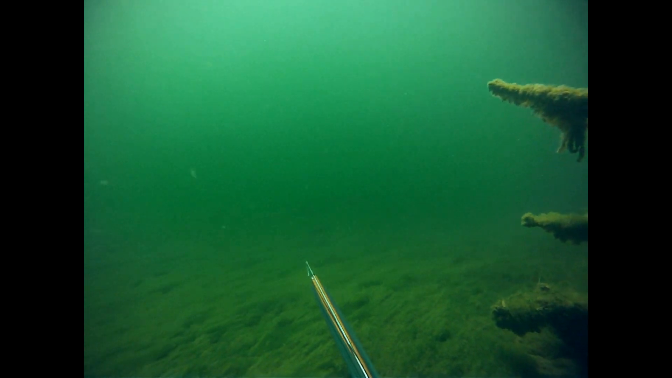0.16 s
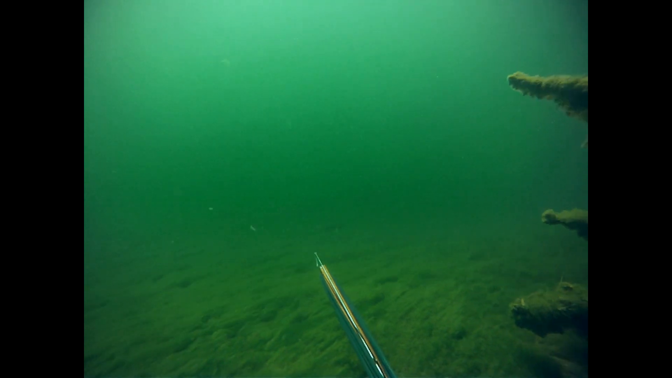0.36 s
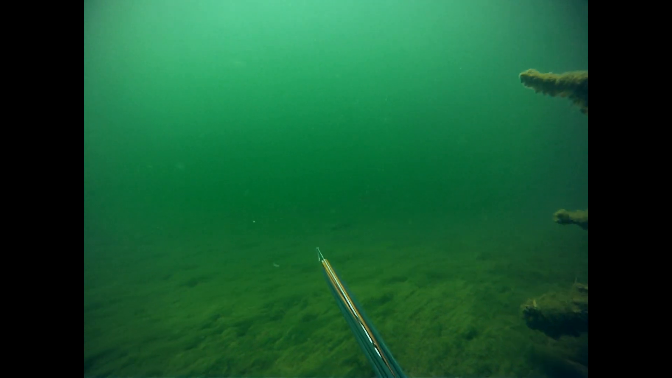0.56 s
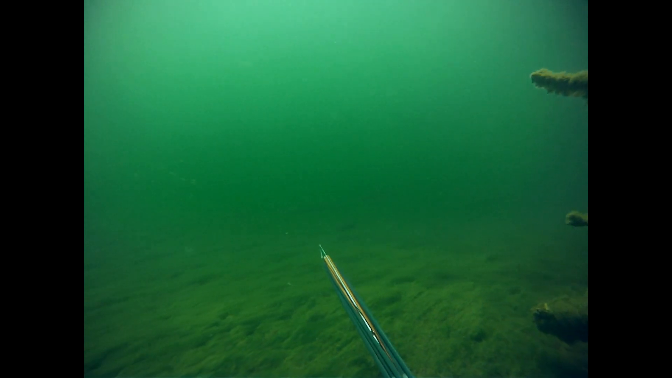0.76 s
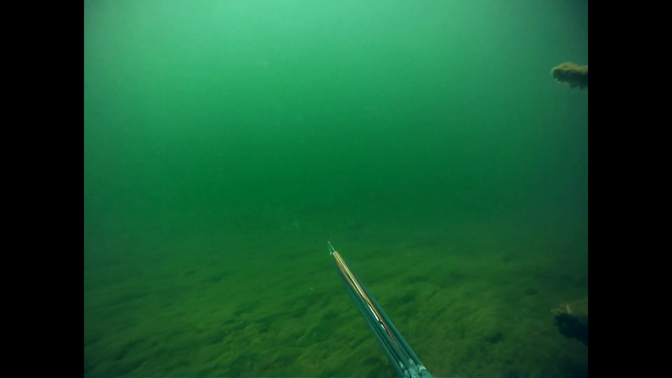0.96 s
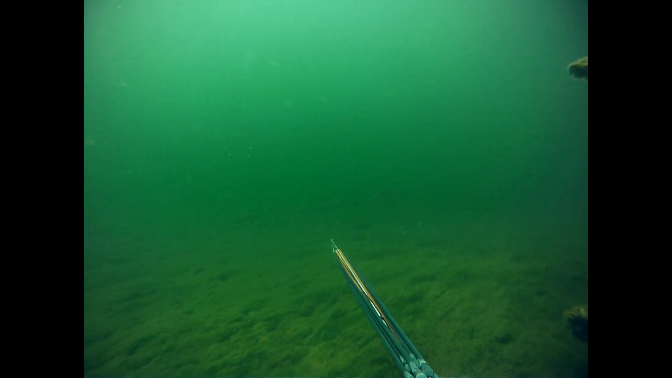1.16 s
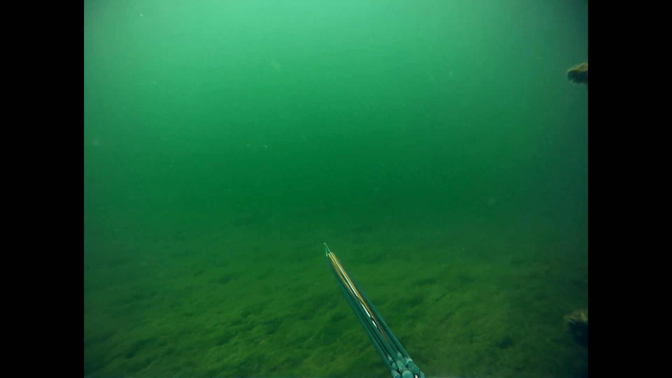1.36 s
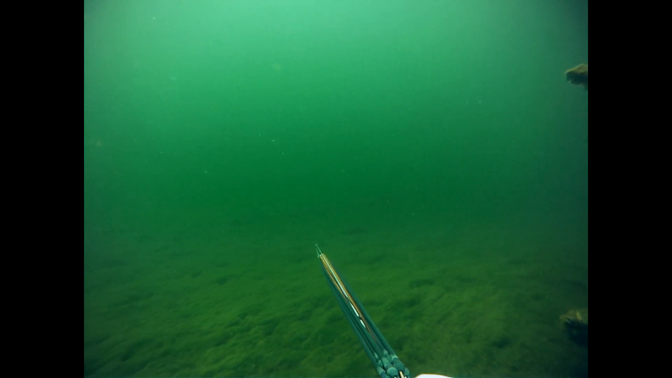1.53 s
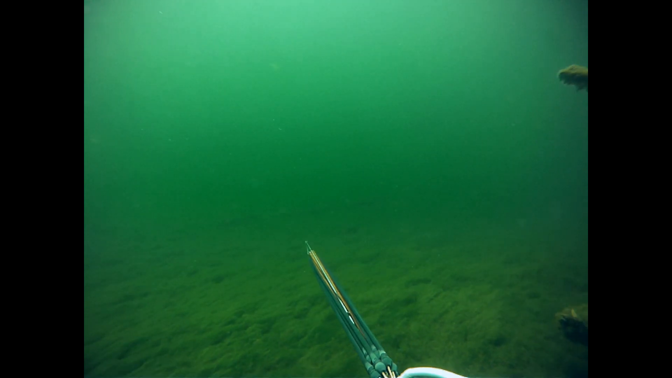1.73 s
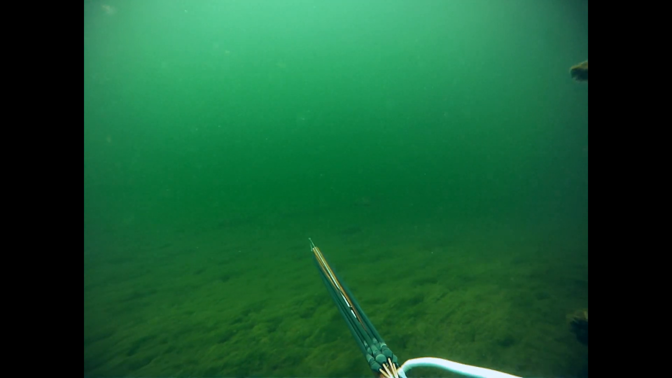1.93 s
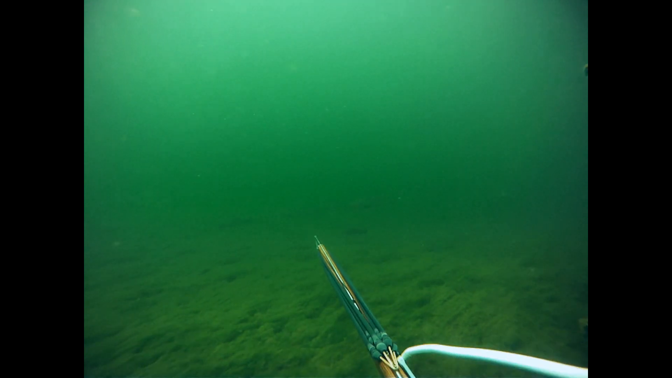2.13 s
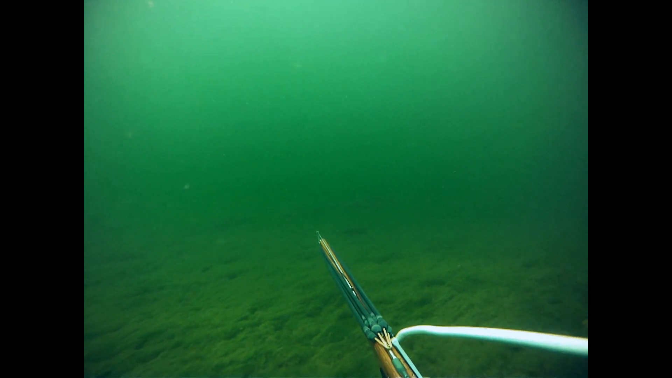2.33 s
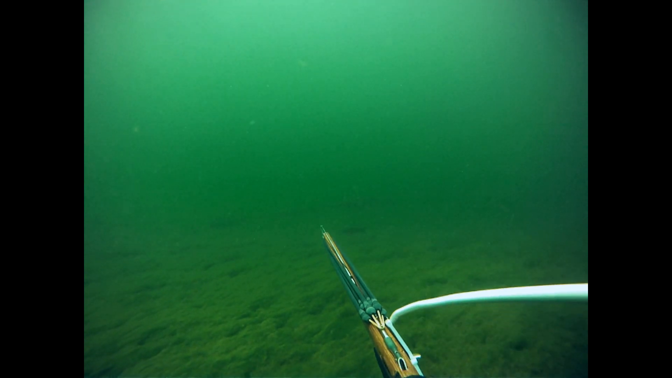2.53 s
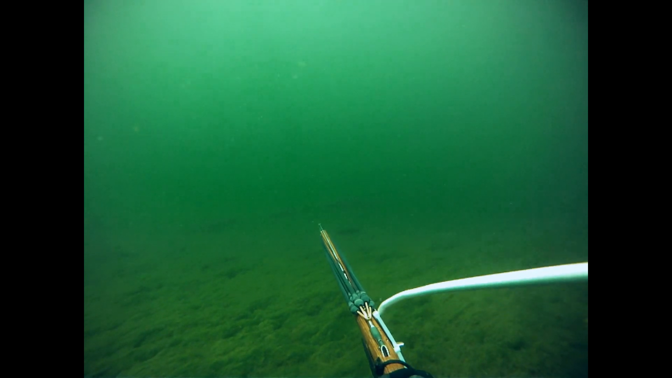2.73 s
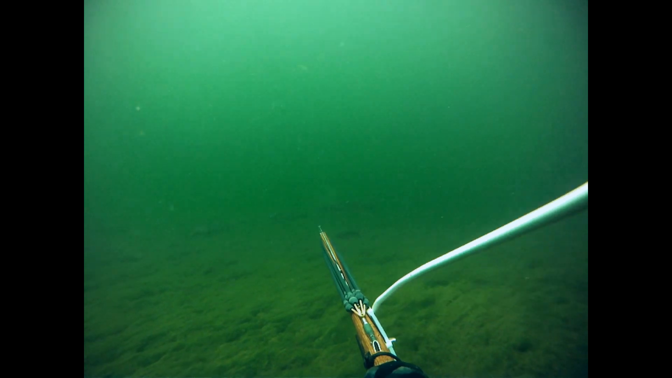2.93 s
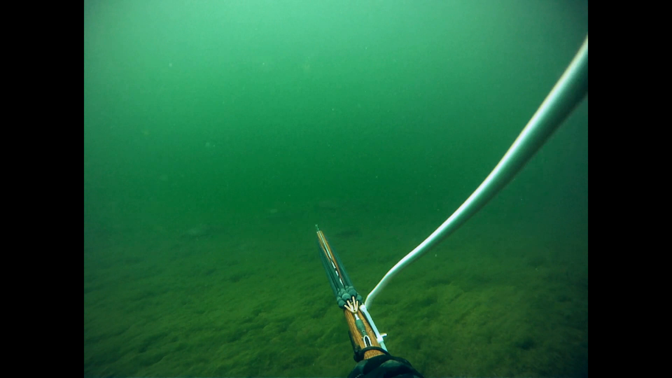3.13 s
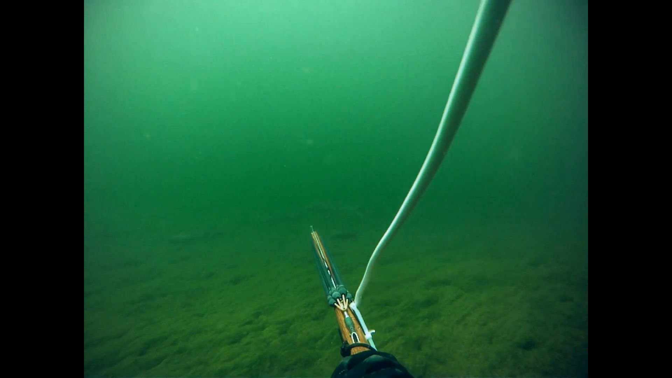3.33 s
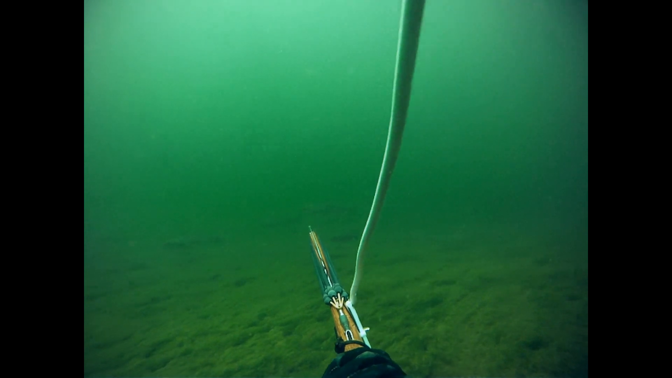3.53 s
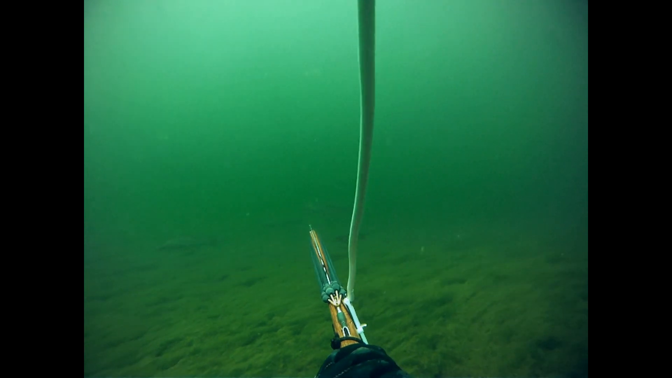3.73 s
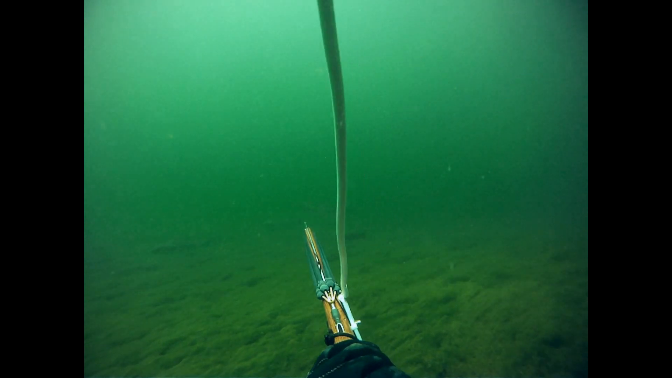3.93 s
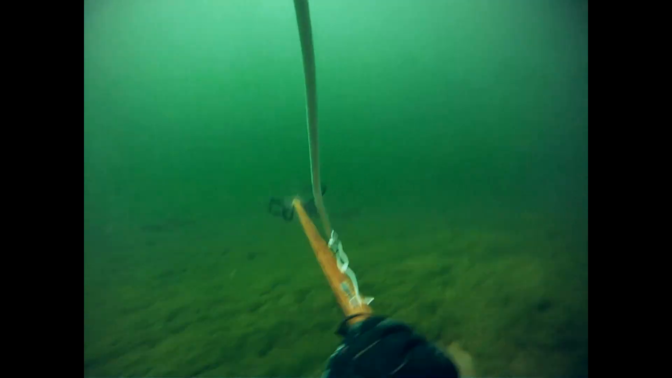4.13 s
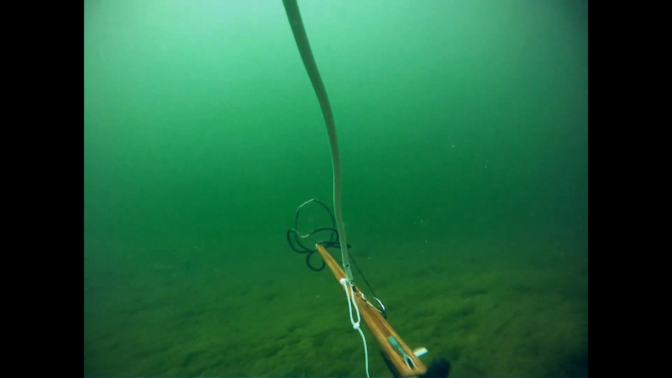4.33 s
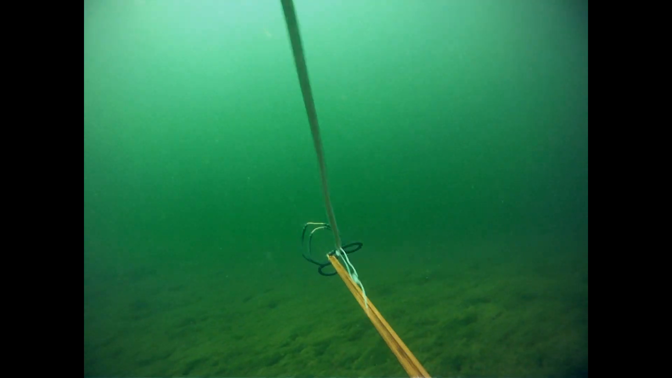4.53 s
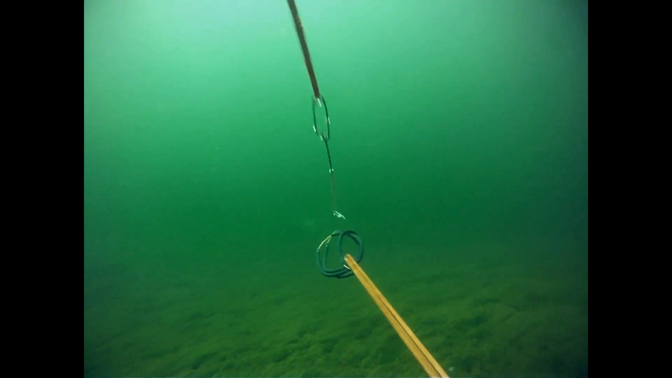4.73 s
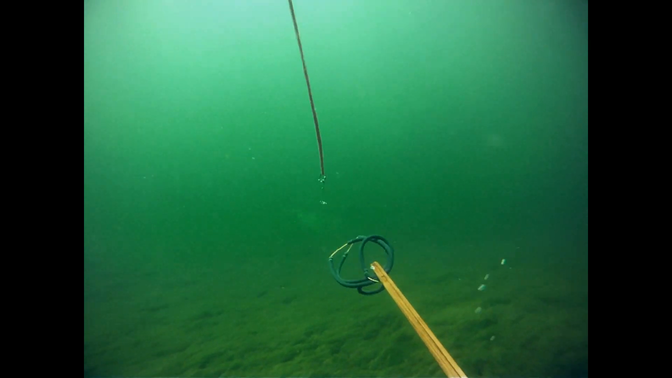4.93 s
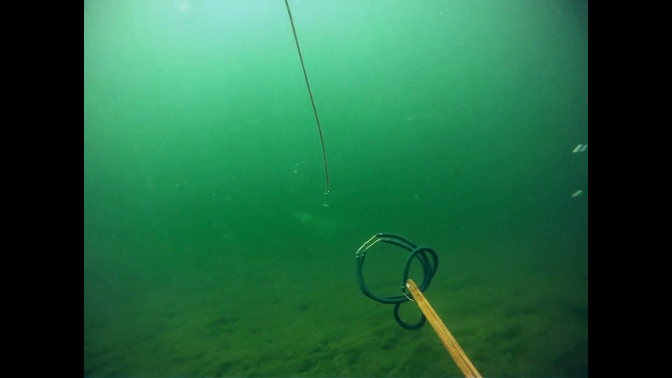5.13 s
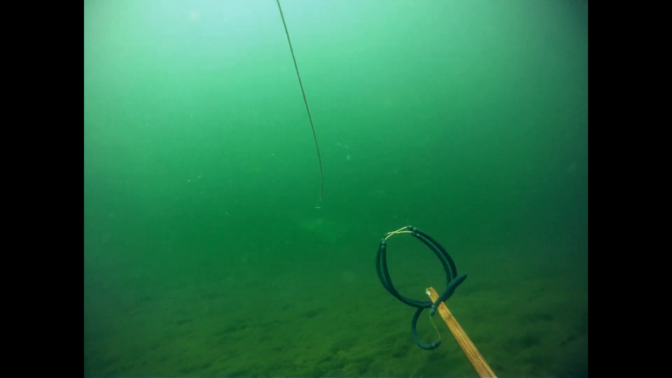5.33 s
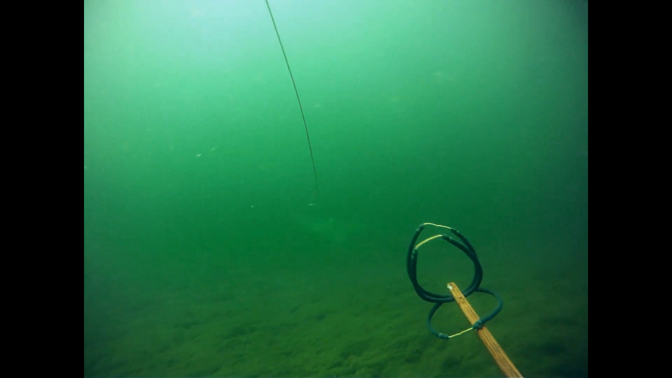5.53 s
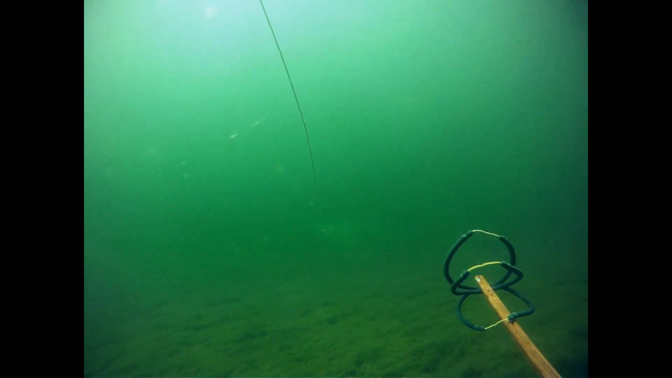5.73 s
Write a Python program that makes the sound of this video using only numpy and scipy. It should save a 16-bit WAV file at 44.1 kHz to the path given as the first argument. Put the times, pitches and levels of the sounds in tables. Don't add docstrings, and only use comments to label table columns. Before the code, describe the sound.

A camera underwater picks up small handling clicks, a violent speargun snap at four seconds, rattling slaps, then a fading low strum and flicks.

```python
import sys
import numpy as np
from scipy import signal
from scipy.fft import rfft, irfft, next_fast_len
from scipy.io import wavfile
from scipy.ndimage import uniform_filter1d, map_coordinates

SR = 44100
rng = np.random.default_rng(int(sys.argv[2]) if len(sys.argv) > 2 else 0)


def natural_amplitude(level_db):
    exponent = np.asarray(level_db, float) / 20
    return 10 ** exponent


def wrap_up_sound(samples):
    columns = np.atleast_2d(samples).T
    tamed = np.clip(columns, -1, 1)
    steps = np.round(tamed * 32767).astype(np.int16)
    wavfile.write(sys.argv[1], SR, steps)


N = 254898


def unit(x):
    return x / np.sqrt(np.mean(x ** 2) + 1e-20)


def curves(rows):
    s, *columns = np.transpose(rows)
    return [np.interp(np.arange(N) / SR, s, column) for column in columns]


def filtered(x, response):
    size = next_fast_len(N + SR // 2)
    return irfft(rfft(x, size) * response(np.fft.rfftfreq(size, 1 / SR)), size)[:N]


def resonant(x, modes):
    def response(f):
        total = 0
        for k, (centre, width, db) in enumerate(modes):
            damping = 1j * f * width
            total = total + (-1) ** k * natural_amplitude(db) * damping / (centre * centre - f * f + damping)
        return total
    return filtered(x, response)


def band(lo_hz, hi_hz):
    def response(f):
        low_cut = (f / lo_hz) ** 2 / (1 + (f / lo_hz) ** 2)
        return low_cut / (1 + (f / hi_hz) ** 2)
    return unit(filtered(rng.standard_normal(N), response))


def coloured(spectrum):
    f, db = np.transpose(spectrum)
    return unit(filtered(rng.standard_normal(N), lambda hz: natural_amplitude(np.interp(np.log(hz + 1), np.log(f + 1), db))))


def grit(rate, spread_db):
    knots = rng.standard_normal(int(N * rate / SR) + 4)
    loudness_db = spread_db * map_coordinates(knots, [np.arange(N) * rate / SR])
    return natural_amplitude(loudness_db) * rng.standard_normal(N)


def add(track, s, piece):
    part = track[round(s * SR):][:len(piece)]
    part += piece[:len(part)]


def swell(t, rise, length):
    shape = (1 - np.exp(-(t / rise) ** 2)) * np.exp(-(t / length) ** 2)
    return shape / shape.max()


# (frequency [Hz], width [Hz], level [dB])
WINDOW = [(2840, 150, -7), (3950, 260, 0), (5250, 130, -23.5)]
# (frequency [Hz], width [Hz], level [dB])
SEAL = [(4600, 4800, -7)]


def strike(contacts, length_ms, body_db):
    ring, snap, thud = np.zeros(N), np.zeros(N), np.zeros(N)
    t = np.arange(SR // 8) / SR
    length = length_ms / 1000
    for s, db, hz, bright_db in contacts:
        second = np.sin(2 * np.pi * 1.149 * hz * t + 2 * np.pi * rng.random())
        beat = 0.98 * np.sin(2 * np.pi * hz * t) + 0.42 * second
        burst = swell(t, 0.0005, 0.64 * length) * rng.standard_normal(len(t))
        add(ring, s - 0.0003, natural_amplitude(db) * swell(t, 0.0011, length) * beat)
        add(snap, s - 0.0003, natural_amplitude(db + bright_db + 15.5) * burst)
        add(thud, s, natural_amplitude(db + body_db + 13.5) * swell(t, 0.00016, 0.00026))
    tail = resonant(ring, [(1720, 160, -24), (2170, 150, -24)])
    return ring + tail + resonant(snap, WINDOW + SEAL) + resonant(thud, [(900, 1300, 0.00077)])


def padded_blows(blows):
    out, t = np.zeros(N), np.arange(SR // 4) / SR
    for s, db, hz, length in blows:
        overtone = 0.18 * np.sin(2 * np.pi * 1.366 * hz * t + 2 * np.pi * rng.random())
        cycles = np.sin(2 * np.pi * hz * t) + overtone
        add(out, s - 0.0015, natural_amplitude(db) * swell(t, 0.2 * length, length) * cycles)
    return out


# (frequency [Hz], level per Hz [dB])
AMPLIFIER_HISS = [(12, -45), (20, 1), (85, -3), (137, -4), (301, -13.5), (324, -13), (421, -14), (463, -15),
                  (630, -17.5), (2220, -22), (5900, -28.5), (7670, -55), (13000, -120)]
# (time [s], level [dB])
MOTION = [(0, -62.5), (1.2, -67.5), (1.8, -63), (2, -64), (2.4, -61), (2.8, -73), (3.1, -65), (3.46, -67),
          (3.86, -55), (3.99, -55.5), (4.14, -25), (4.18, -29), (4.36, -45), (4.85, -46), (5.09, -52),
          (5.78, -58)]


def water():
    motion_db, = curves(MOTION)
    hiss = natural_amplitude(-60) * coloured(AMPLIFIER_HISS)
    slosh = natural_amplitude(motion_db - 3.5) * band(11, 55)
    gurgle_level = natural_amplitude(-68.5) + natural_amplitude(motion_db - 16)
    return hiss + slosh + gurgle_level * natural_amplitude(-5.5) * band(130, 330)


def creak():
    t = np.arange(N) / SR
    stroke = np.clip((t - 0.37) / 0.057, 0, 1) * (t < 0.505)
    squeak = resonant(grit(rate=140, spread_db=5.5), [(3900, 900, 4), (4640, 550, -7)])
    return natural_amplitude(-66.5) * stroke * unit(squeak)


# (time [s], peak level [dB], ring [Hz], brightness [dB])
HANDLING = [(.5072, -45.5, 1740, -12), (.5397, -47, 2000, -18), (1.7613, -37, 1540, -20),
            (1.7617, -38.5, 2150, -25), (1.7757, -48, 1640, -27), (2.2218, -53, 1590, -11),
            (2.2717, -51, 1580, -20), (2.2974, -56, 1980, -20), (2.4269, -49, 1570, -19),
            (2.6137, -45, 1390, -31), (2.624, -26.5, 1890, -28), (2.628, -30.5, 1950, -36),
            (2.6953, -42.5, 1950, -20), (2.71, -49, 1680, -19), (2.7219, -23.5, 2030, -15)]


def handling():
    return strike(HANDLING, length_ms=2.67, body_db=-17)


# (time [s], peak level [dB], ring [Hz], length [s])
KNOCKS = [(.511, -40, 374, 0.0035), (.54, -57, 900, 0.0035), (0.567, -53, 355, 0.01),
          (1.406, -43.5, 147, 0.013), (1.764, -31.5, 318, 0.0095), (1.765, -38.5, 168, .009),
          (1.778, -42, 338, 0.014), (2.026, -51, 310, 0.014), (2.049, -42.5, 365, 0.01),
          (2.227, -40, 276, 0.0048), (2.275, -41, 348, 0.0086), (2.431, -42.5, 332, 0.0063),
          (2.46, -48, 350, 0.0086), (2.51, -40.5, 278, 0.0057), (2.608, -45.5, 376, 0.022),
          (2.6262, -24, 369, 0.013), (2.627, -36, 500, 0.007), (2.628, -34.5, 161, 0.012),
          (2.652, -51, 383, 0.027), (2.679, -49, 373, 0.02), (2.7, -44, 300, 0.014),
          (2.7266, -29, 290, 0.0033), (2.7312, -32.5, 186, 0.0063)]


def knocks():
    return padded_blows(KNOCKS)


# (start [s], length [s], rms level [dB], brightness [dB])
SCRAPES = [(1.759, 0.014, -57, -18), (2.607, 0.046, -50.5, -13), (2.69, 0.033, -59, -18),
           (2.724, 0.013, -51.5, -7), (4.03, 0.0096, -36, -2.5), (4.037, 0.022, -19.5, -8),
           (4.049, .026, -22.5, -11), (4.063, .05, -48, -3), (4.126, 0.028, -34, -1),
           (4.17, 0.024, -33, -1), (4.19, .052, -29.5, -14), (4.235, 0.022, -49, -22),
           (4.269, 0.015, -44.5, 0), (4.6, 0.016, -53, -1), (5.366, 0.043, -60.5, -10),
           (4.392, 0.027, -43, -4), (4.425, 0.028, -46.5, 3), (4.446, 0.0098, -49, 2),
           (4.572, 0.041, -50.5, -16), (4.987, 0.076, -56.5, -24), (5.525, 0.09, -66, -26),
           (5.616, 0.098, -65, -20)]
# (time [s], level [dB])
RUB = [
    (4.04, -63),
    (4.12, -47.5),
    (4.2, -45),
    (4.26, -48),
    (4.47, -50),
    (4.79, -54.5),
    (5.18, -62),
    (5.54, -57),
    (5.77, -64),
]
# (frequency [Hz], width [Hz], level [dB])
WALLS = [(498.4, 50, -11.5), (1043, 86, -20.5), (1464, 130, -0.5), (1635, 220, 2.5), (2213, 156, 3.5),
         (2430, 69, 2.5)]


def friction():
    t = np.arange(N) / SR
    rub_db, = curves(RUB)
    clumps = map_coordinates(rng.standard_normal(size=200), [t * 14])
    body = natural_amplitude(rub_db + 1.5 * clumps) * (t > RUB[0][0])
    edge = body * natural_amplitude(-8.5)
    for s, length, db, bright_db in SCRAPES:
        progress = np.clip((t - s) / length, 0, 1)
        stroke = natural_amplitude(db) * np.sin(np.pi * progress ** 0.86) ** 0.95
        body = body + stroke
        edge = edge + stroke * natural_amplitude(bright_db)
    slips = unit(grit(rate=180, spread_db=3.0))
    panels = np.zeros(N)
    for mode in WALLS:
        own_slips = unit(grit(rate=110, spread_db=4))
        panels += resonant(0.44 * slips + own_slips, [mode])
    walls = resonant(panels, [(1950, 660, 0.25), (500, 310, 1.3)])
    window = resonant(slips, WINDOW + [(4400, 5800, -7)])
    return body * unit(walls) + edge * unit(window)


# (time [s], peak level [dB])
PINGS = [
    (2.626, -48),
    (4.2047, -26.5),
]


def pings():
    ping_hz, bright_db = 3540, -28
    return strike([(s, db, ping_hz, bright_db) for s, db in PINGS], length_ms=7.5, body_db=-30)


# (time [s], peak level [dB], ring [Hz], brightness [dB])
RELEASE = [
    (4.021, -10.5, 1770, -8),
    (4.0227, -1.1, 1815, -9),
    (4.0245, -5, 2270, -7.5),
]


def release():
    return strike(RELEASE, length_ms=2.04, body_db=-20.5)


# (centre [s], peak level [dB], swing [Hz], half width [s], direction and strength
JOLTS = [(4.024, -6.5, 145, 0.00098, -0.63), (4.0275, -7, 85, 0.0029, 0.98),
         (4.0332, -13.5, 69.6, 0.0023, -1), (4.042, -23, 50, .004, 0.68), (4.118, -28, 110, 0.0034, -1.1),
         (4.19, -30, 50, .005, -1), (4.1529, -19.5, 150, 0.0013, 0.96), (4.158, -13.5, 150, 0.00106, 0.82),
         (4.162, -9.5, 91.5, 0.0023, -0.78), (4.172, -15, 36.1, 0.006, 1), (4.198, -24.5, 150, .0028, 1),
         (4.21, -20, 30, 0.012, 1), (4.225, -34, 69.6, .005, -1)]


def jolts():
    t, out = np.arange(N) / SR, np.zeros(N)
    for s, db, hz, half, direction in JOLTS:
        push = np.exp(-0.5 * ((t - s) / half) ** 2)
        out += direction * natural_amplitude(db) * push * np.cos(2 * np.pi * hz * (t - s))
    return out


# (peak time [s], level [dB], hum [Hz], half length [s])
TUGS = [(4.067, -37, 95.5, 0.026), (4.12, -36.5, 91.4, 0.046), (4.2, -27, 85.4, .02),
        (4.386, -37.5, 98.2, 0.039), (4.527, -39.5, 103.6, .04), (4.674, -41.5, 93.8, 0.03),
        (4.772, -45.5, 94.4, 0.032), (4.88, -44, 100, 0.022), (4.937, -44.5, 92.7, .02),
        (4.99, -45, 106, 0.019), (5.082, -52, 104.1, .03), (5.218, -45.5, 103, 0.018),
        (5.348, -53, 100, 0.066), (5.652, -57, 98.4, 0.024)]


def strum():
    t = np.arange(N) / SR
    _, hz, _ = curves(TUGS)
    level = natural_amplitude(-63.5)
    for s, db, _, half in TUGS:
        level = level + natural_amplitude(db) * np.exp(-0.5 * ((t - s) / half) ** 2)
    phase = 2 * np.pi * np.cumsum(hz + 4 * band(3.5, 14)) / SR
    broken_tone = unit(1 + 0.4 * band(4, 16)) * np.sqrt(2) * np.sin(phase)
    wake = unit(resonant(rng.standard_normal(N), [(100, 34, 4), (167, 70, -5.5)]))
    return level * (t > RUB[0][0]) * (0.74 * broken_tone + 0.27 * wake)


# (time [s], peak level [dB], ring [Hz])
BUMPS = [(4.063, -32, 484), (4.177, -26, 162), (4.183, -25, 340), (4.186, -30, 510), (4.394, -49, 149),
         (4.397, -49.5, 340), (4.398, -50.5, 500), (4.797, -50, 343), (5.471, -51, 291), (5.635, -55, 291),
         (4.729, -42, 508), (4.842, -46, 350), (4.972, -47.5, 363), (5.24, -54.5, 164), (5.47, -54, 174),
         (5.52, -50.5, 327)]


def bumps():
    length = 0.013
    return padded_blows([(*row, length) for row in BUMPS])


# (time [s], peak level [dB], ring [Hz], brightness [dB])
CLATTER = [(4.0665, -22, 1670, -29), (4.077, -27.5, 1780, -1), (4.0946, -30, 1470, -26),
           (4.13, -16, 1950, -28), (4.1378, -16.5, 2250, -1.5), (4.1365, -14.5, 2330, -15.5),
           (4.148, -34, 2320, -12), (4.1757, -19, 1810, -27), (4.1803, -21.5, 1530, -2.5),
           (4.1814, -11.5, 1830, -31), (4.1896, -18, 1840, -25), (4.2553, -35, 2040, -5),
           (4.2742, -32.5, 2030, -8), (4.2964, -24, 1760, -15.5), (4.3338, -34, 1730, -24),
           (4.3985, -30, 2200, -16), (4.4046, -16, 2210, -11.5), (4.4195, -29.5, 1872, -8),
           (4.4306, -24, 2100, -12), (4.4364, -32, 2316, -1), (4.4475, -28, 2120, -14),
           (4.753, -50, 1960, -1)]


def clatter():
    return strike(CLATTER, length_ms=1.9, body_db=-31)


# (time [s], peak level [dB], ring [Hz])
FLICKS = [(4.4772, -38, 2110), (4.5785, -36, 1590), (4.5847, -36.5, 1680), (4.6442, -36.5, 2200),
          (4.7215, -43, 1800), (4.8094, -46, 1654), (4.8155, -44, 2316), (5.01, -43, 1604),
          (5.37, -53, 1550), (5.6296, -40, 2097), (5.635, -42.5, 2182), (5.6698, -42.5, 1530),
          (5.7102, -46, 1800), (5.715, -45, 2080)]


def flicks():
    bright_db = -24
    return strike([(*row, bright_db) for row in FLICKS], length_ms=4, body_db=-34)


def scene():
    before_shot = water() + creak() + handling() + knocks() + friction() + pings()
    shot = release() + jolts() + strum() + bumps() + clatter() + flicks()
    return np.tile(before_shot + shot, (2, 1))


# (frequency [Hz], level per Hz [dB])
APART = [(35, -39.5), (60, -15.5), (215, 5), (593, -2), (2220, -4.5), (5150, -6), (5990, -26), (6820, -9),
         (9030, -13.5), (10500, -31), (13600, -59), (22000, -120)]


def difference(x):
    hiss, common = signal.stft([natural_amplitude(-78) * coloured(APART), x], nperseg=512)[2]

    def power(cells):
        over_pitch = uniform_filter1d(np.abs(cells) ** 2, size=12, axis=0)
        return uniform_filter1d(over_pitch, size=5, axis=1)
    uncovered = power(common) < natural_amplitude(2 * 24) * power(hiss)
    return signal.istft(hiss * uncovered, nperseg=512)[1][:N]


def roll_off(x):
    return signal.sosfilt(signal.butter(12, 17570, fs=SR, output="sos"), x)


def record(dry):
    camera_hz = 12000
    smooth = signal.sosfilt(signal.cheby1(10, 0.5, 5600, fs=SR, output="sos"), dry[0])
    smooth = np.roll(smooth, -9)
    slow = signal.resample(smooth, round(N * 4 * camera_hz / SR))[::4]
    clipped = slow / (1 + np.abs(slow / 0.7) ** 8) ** (1 / 8)
    held = signal.resample(np.repeat(clipped, repeats=4), N)

    def edge(hz, top_hz):
        return np.clip((top_hz - hz) / 250, 0, 1) ** 2

    def treble_limit(hz):
        return edge(hz, 15550) + natural_amplitude(-30) * edge(hz, 16900) + natural_amplitude(-46) * edge(hz, 17700)
    held = filtered(held, treble_limit)
    loudness = np.sqrt(np.abs(uniform_filter1d(held ** 2, size=600)))
    loud_noise = natural_amplitude(-42.5) * loudness * (loudness > natural_amplitude(-21)) * band(120, 3000)
    side = difference(held) + loud_noise
    return roll_off(np.array([held + side, held - side]))


dry = scene()
out = record(dry)
wrap_up_sound(out)
```